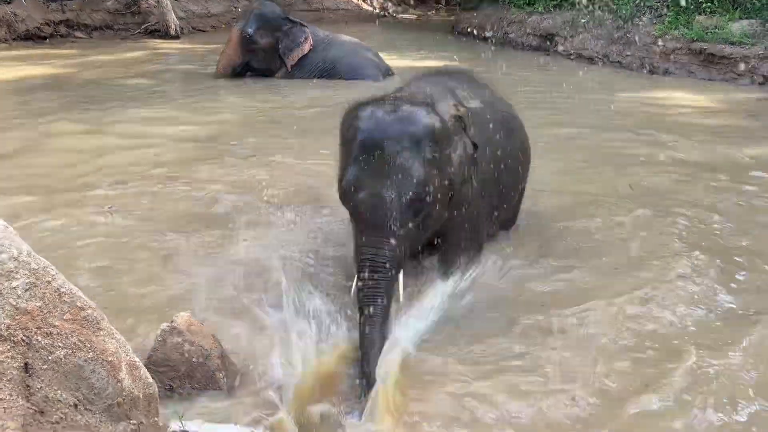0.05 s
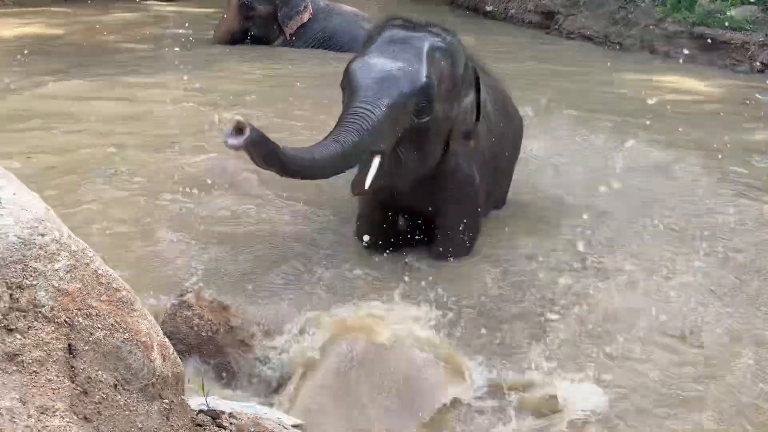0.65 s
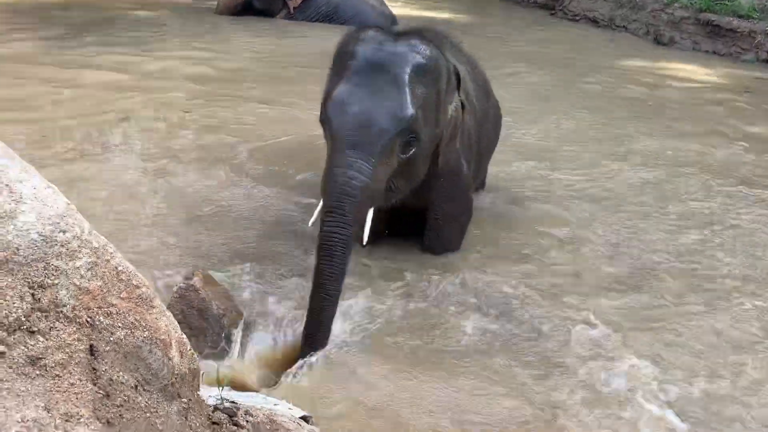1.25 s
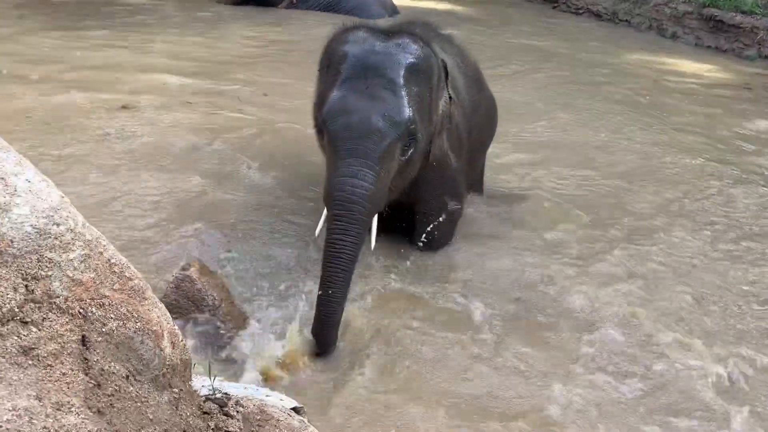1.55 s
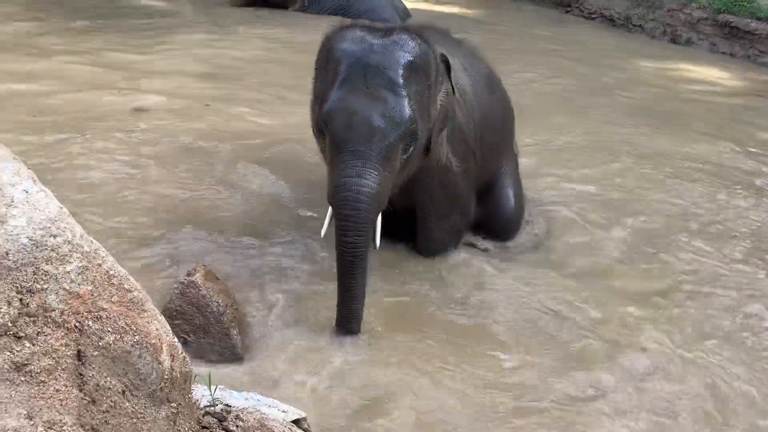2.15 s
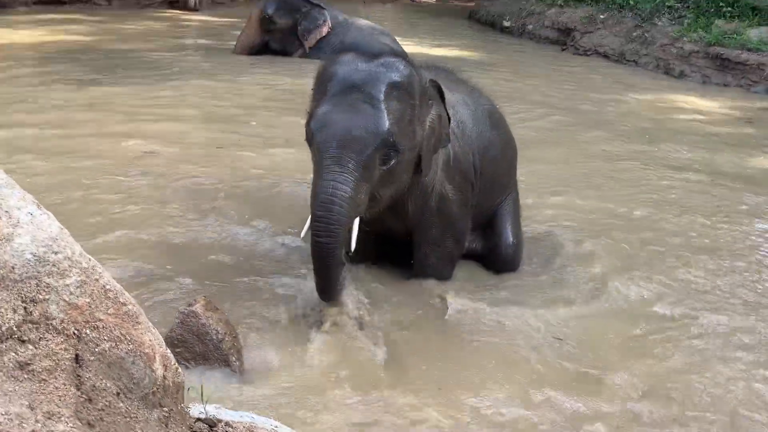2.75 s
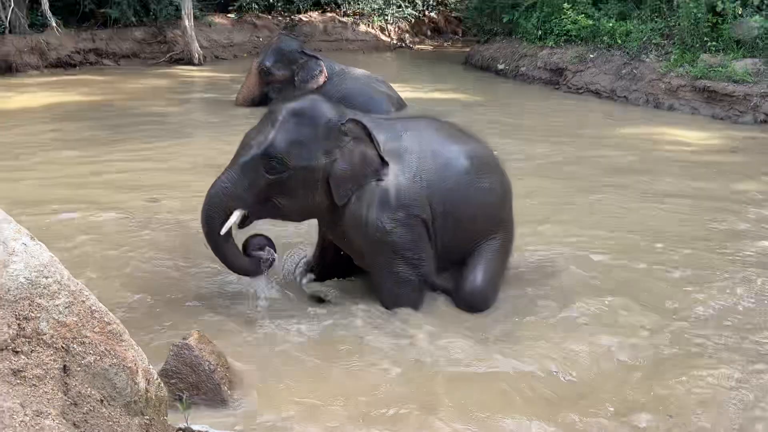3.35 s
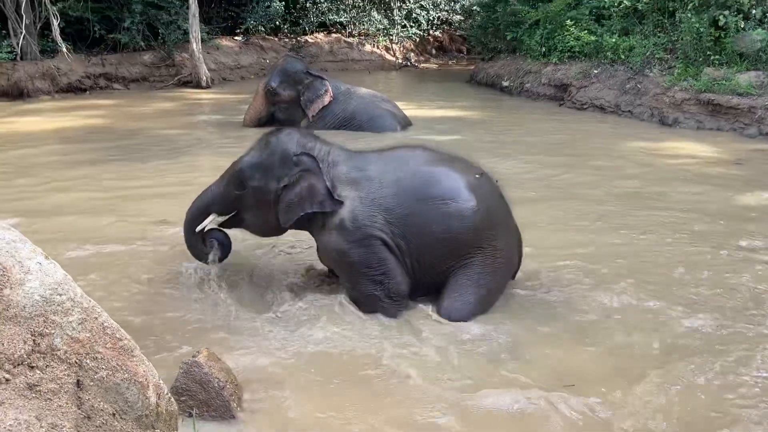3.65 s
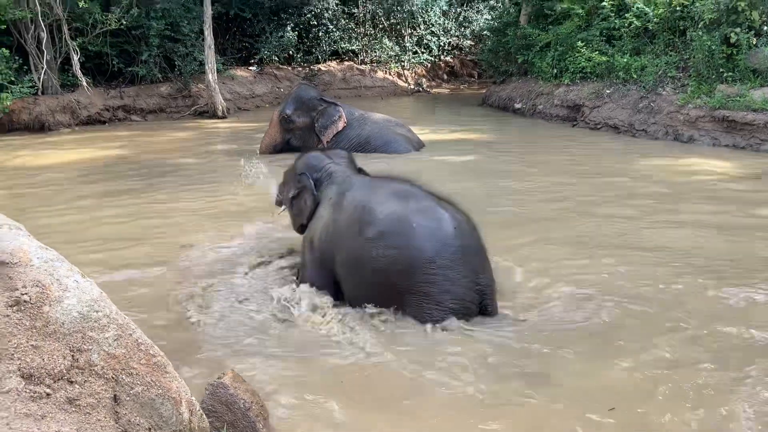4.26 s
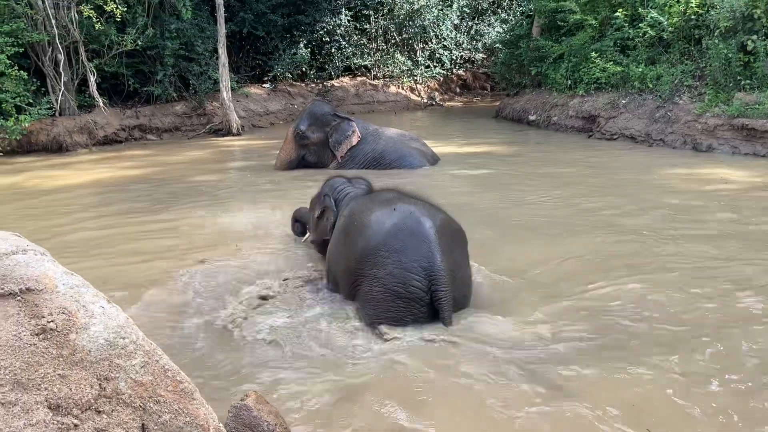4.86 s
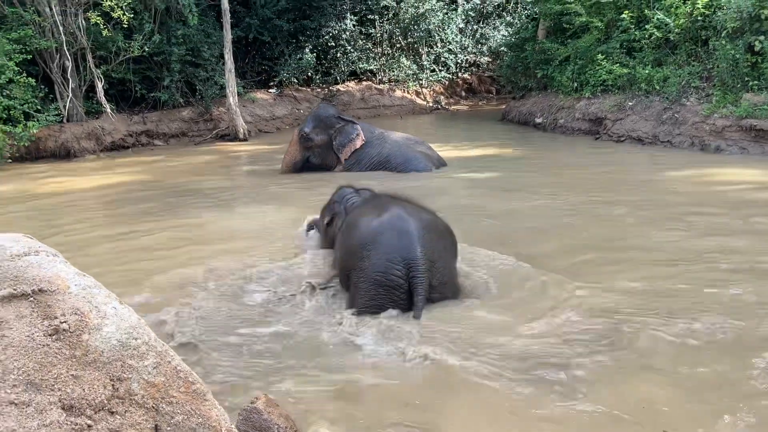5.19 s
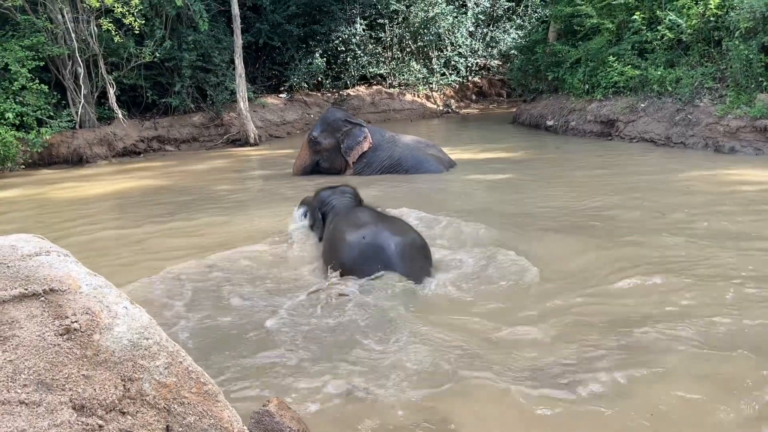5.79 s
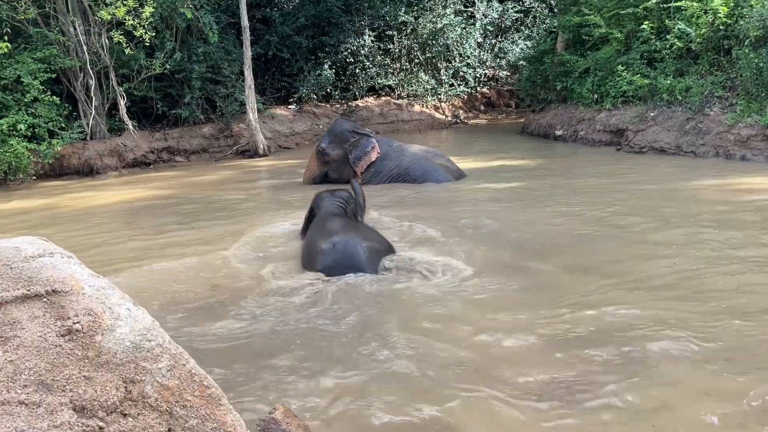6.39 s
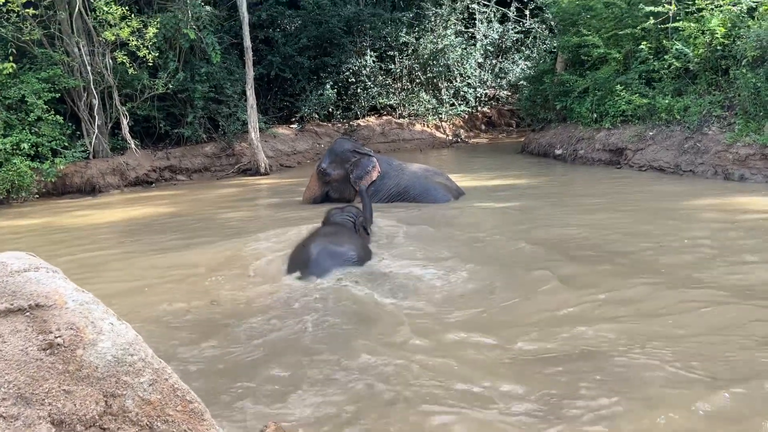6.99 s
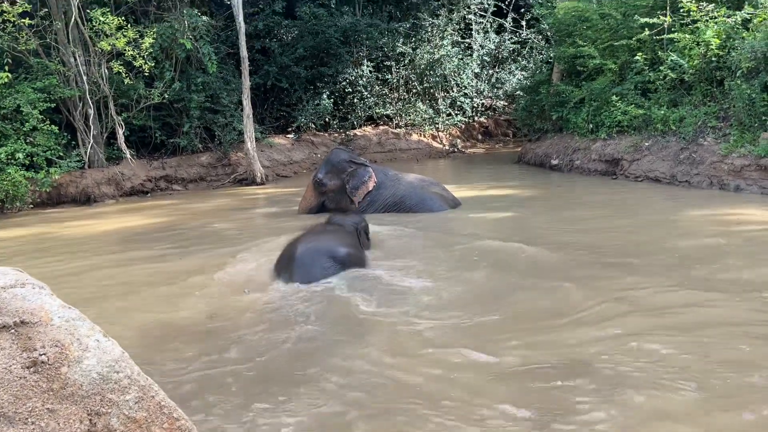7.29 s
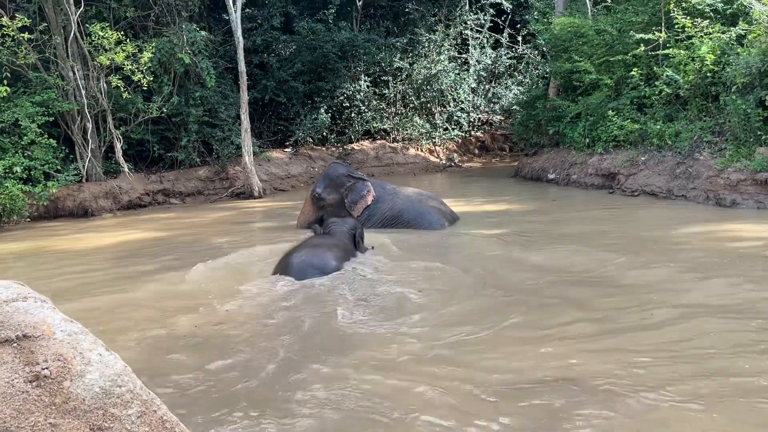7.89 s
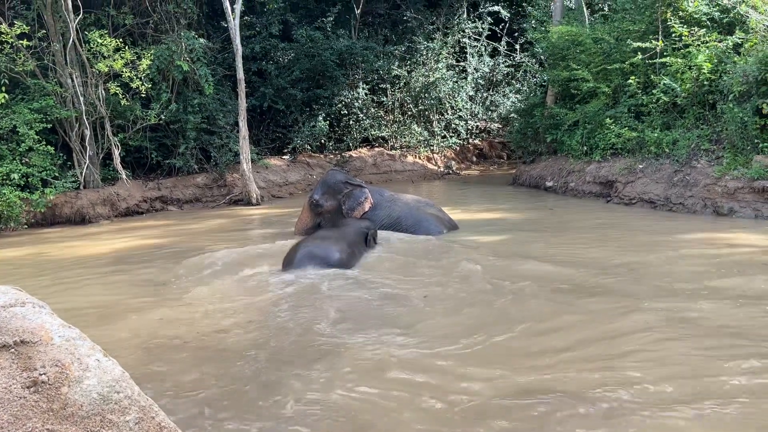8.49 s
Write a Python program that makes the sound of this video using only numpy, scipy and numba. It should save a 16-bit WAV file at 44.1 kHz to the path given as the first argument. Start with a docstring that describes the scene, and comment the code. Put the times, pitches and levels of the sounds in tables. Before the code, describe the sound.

A young elephant slaps its trunk on a pond with a loud, deep smack, and the thrown water rains back in a fizzing patter. Smaller splashes, drips and bubbles follow. The animal then wades off, shoving the water in a run of sloshes, plops and hollow gulps that settle into gentle lapping. It is heard from the bank on a phone, with faint forest hiss and a low distant drone underneath.

```python
"""A young elephant slaps its trunk on a muddy pond, the thrown water rains back, and it wades off and sinks in.
The water's voice is trapped air ringing: big pockets plop and gulp, clouds of small bubbles churn
and fizz, and gritty bursts of noise give the smacks, splats and ticks their attack.
Underneath lies a bed of low distant drone and forest hiss; a phone listens from the bank."""
import sys
import numpy as np
from scipy import signal
from scipy.fft import rfft, irfft, next_fast_len
from scipy.io import wavfile
from scipy.ndimage import uniform_filter1d
from numba import njit

SR = 44100
rng = np.random.default_rng(int(sys.argv[2]) if len(sys.argv) > 2 else 0)


def wrap_up_sound(samples):
    """Save the sound to the file named by the first command line argument, as 16-bit audio."""
    columns = np.atleast_2d(samples).T
    # keep every value between -1 and 1, then stretch to whole-number steps
    tamed = np.clip(columns, -1, 1)
    steps = np.round(tamed * 32767).astype(np.int16)
    wavfile.write(sys.argv[1], SR, steps)


N = 385434
T = np.arange(N) / SR

# Tone of the distant drone. Each row: frequency in Hz, relative level in dB.
DRONE_TONE = [(20, -53), (40, -13), (58, 4.5), (70, 0), (100, 3), (150, -9.5), (300, -65), (1000, -52)]
# Tone of the forest hiss. Each row: frequency in Hz, relative level in dB.
FOREST_TONE = [(100, -17), (700, -31), (2000, -10.5), (5000, -11), (15000, -32)]
# Tone of the wash of fine drops. Each row: frequency in Hz, relative level in dB.
WASH_TONE = [(120, -21), (330, 4.5), (750, 8), (2800, 1.5), (5000, -8), (7500, -26), (11000, -11.5),
             (15000, -23)]
# Fader ride of the wash. Each row: time in seconds, level in dB.
WASH_RIDE = [(0.26, -74), (0.29, -37), (0.56, -39.5), (0.76, -32), (0.92, -42.5), (1.15, -48), (1.5, -80)]
# Loudness of churning bubbles by pitch. Each row: pitch in Hz, relative level in dB.
BUBBLE_TONE = [(100, -4.5), (300, -3.5), (750, -2), (1100, -4), (2000, -7), (3200, -7), (5000, -11.5),
               (7500, -20), (11000, -15), (15500, -18)]
# The restless pond between shoves. Each row: time in seconds, lapping in dB, trickling spray in dB.
WAKE = [(0, -36, -36.5), (1.12, -36, -40.5), (1.35, -42, -40.5), (1.9, -41, -44.5), (2.3, -44.5, -46.5),
        (2.7, -36.5, -47), (3.0, -39.5, -39.5), (3.2, -40, -44), (4.4, -35.5, -41.5), (4.85, -41.5, -45.5),
        (5.85, -38, -48.5), (6.4, -39.5, -47), (7.3, -47, -51), (7.75, -44, -52.5), (8.74, -43, -51.5)]
# The wake sloshes most while the body wades deep, less in the shallows and once it floats.
# Each row: time in seconds, slosh in dB relative to the lapping.
WADING_DEPTH = [(3.2, -12), (3.65, -7.5), (5.9, -4), (7.0, -5)]
# Trunk and legs shoving water. Each row: crest in seconds, splash level in dB, length in seconds,
# slosh in dB relative to the splash.
SHOVES = [(0.747, -31, 0.46, -6.5), (1.745, -28.5, 0.024, -12), (2.496, -34.5, 0.063, -14),
          (2.725, -32, 0.012, -2), (2.847, -33.5, 0.074, -22), (3.37, -28, 0.035, -5.5),
          (3.474, -35.5, 0.14, -1.5), (3.703, -32.5, 0.047, 1), (3.99, -31, 0.2, -0.5),
          (4.15, -31.5, 0.072, 4), (4.384, -42.5, 0.3, 1.5), (4.757, -37, 0.064, -8),
          (5.03, -36.5, 0.16, -11), (5.318, -46, 0.47, 1), (5.472, -34, 0.072, -7),
          (5.566, -38.5, 0.042, -1), (5.72, -34, 0.082, -5), (6.75, -43.5, 0.1, -16)]
# Dripping grows slightly until five seconds, then fades away. Each row: time in seconds, level in dB.
DRIP_RIDE = [(0.9, -55), (2.6, -51), (3.5, -50), (5.0, -49), (8.7, -77)]
# Fat drops landing close by. Each row: start in seconds, level in dB, centre in Hz, decay in seconds.
FAT_DROPS = [(0.094, -21.5, 8000, 0.00095), (0.1621, -9.5, 4060, 0.00097), (0.412, -20.5, 4900, 0.0018),
             (0.954, -24.5, 6100, 0.0019), (2.143, -33.5, 6000, .025), (3.0122, -24.5, 6070, 0.00088),
             (3.047, -24, 5730, 0.00068), (3.6608, -25.5, 11500, 0.00049), (3.984, -21.5, 5400, 0.0014),
             (8.5182, -30, 6500, 0.00097)]
# Wavelets hitting the animal. Each row: start in seconds, level in dB, decay in seconds, centre in Hz.
SPLATS = [(1.766, -28, 0.0078, 1300), (2.146, -30.5, 0.018, 1490), (3.098, -23, 0.0032, 1650),
          (3.229, -22.5, 0.0068, 1400), (3.277, -28, 0.0046, 1980), (3.433, -22.5, 0.008, 1550),
          (3.777, -28, 0.0066, 1000), (4.634, -33, 0.0069, 1340), (5.042, -22.5, 0.0013, 1520),
          (5.53, -28, 0.0069, 1500), (5.727, -28.5, 0.0092, 850), (5.885, -35, 0.0042, 1600),
          (6.153, -24.5, 0.0032, 2000)]
# Surfacing bubbles. Each row: crest in seconds, pitch at the crest in Hz, peak in dB.
BLOOPS = [(1.522, 590, -37), (1.699, 915, -32.5), (1.725, 1410, -37), (1.868, 650, -41.5)]
# Cavities that open and close. Each row: widest moment in seconds, pitch there in Hz, level in dB,
# opening time in seconds, closing time in seconds.
GULPS = [(0.323, 206, -32.5, 0.039, 0.015), (0.395, 209.6, -25.5, .014, 0.027),
         (0.438, 278, -32, 0.0085, 0.057), (0.828, 229, -27, 0.013, 0.015),
         (1.424, 386, -30.5, 0.026, 0.017), (3.411, 155.6, -23, .022, 0.039),
         (3.49, 92.4, -33, 0.026, 0.025), (3.964, 229, -29, 0.009, 0.038),
         (5.554, 247.3, -36, 0.024, 0.035), (6.687, 161.5, -26.5, 0.00614, 0.011)]
# Single large bubbles. Each row: start in seconds, pitch in Hz, level in dB before trim.
PLOPS = [(0.162, 1300, -8.5), (0.265, 1420, -14.5), (0.745, 1440, -15), (2.055, 394, -23.5),
         (2.313, 1420, -29), (2.326, 590, -28.5), (2.533, 680, -29), (2.598, 970, -20), (2.64, 660, -17.5),
         (3.012, 705, -19.5), (3.252, 305, -14), (3.335, 594, -14.5), (3.436, 843, -18), (3.463, 1470, -13),
         (3.703, 745, -15.5), (3.883, 348, -17.5), (4.098, 780, -11.5), (4.101, 112.6, -21),
         (4.442, 585, -13.5), (5.312, 420, -26), (7.836, 570, -27), (7.93, 890, -29)]
# Trunk or leg hitting the pond. Each row: start in seconds, smack in dB, smack decay in seconds,
# air pocket pitch in Hz, its level in dB, deep cavity pitch in Hz, its level in dB, its decay in cycles.
BLOWS = [(0.038, -13, 0.018, 537, -11, 253, 0.5, 0.83), (1.2, -30, 0.032, 284, -9.5, 142, -18.5, 0.83),
         (1.439, -24, 0.0059, 423, -9, 93, -8.5, 1.5), (2.448, -33, 0.009, 442, -9, 117, -16, 1.1),
         (5.458, -42, 0.028, 219, -19, 140, -27, 1.2), (6.663, -37, 0.0055, 228, -35, 133, -23, 1.8)]
# Stereo width by frequency. Each row: frequency in Hz, likeness of left and right from 0 to 1,
# left phase lead in radians, left minus right in dB.
STEREO_IMAGE = [(100, .985, 0, .9), (400, .92, 0, 1.), (1400, .72, 0, -1.2), (2100, .85, .2, -.5),
                (3600, .5, 2.3, 1.8), (4900, .35, 0, 3.5), (6800, .55, -1.4, 2), (8300, .96, -3.14, 0),
                (11700, .95, -6.3, 0), (14700, .95, -8.6, 0)]


def undb(db):
    """Decibels to gain."""
    return 10 ** (np.asarray(db) / 20)


def unit(x):
    """Scale to an rms of one."""
    return x / np.sqrt(np.mean(x ** 2))


def ride(points):
    """Draw a fader curve through (seconds, dB) points, in dB."""
    return np.interp(T, *np.transpose(points))


def gain_at(hz, tone):
    """Gain of a (Hz, dB) curve at the given frequencies."""
    f, db = np.transpose(tone)
    return undb(np.interp(np.log(hz + 1), np.log(f), db))


def colour(x, gain):
    """EQ by a gain that is a function of frequency."""
    size = next_fast_len(len(x) + SR // 10)
    return irfft(rfft(x, size) * gain(np.arange(size // 2 + 1) * SR / size), size)[:len(x)]


def toned_noise(tone):
    """Noise shaped to a (Hz, dB) curve, at an rms of one."""
    return unit(colour(rng.standard_normal(N), lambda f: gain_at(f, tone)))


def band(x, lo_hz, hi_hz, order):
    """Band-pass filter."""
    edges = [lo_hz, min(hi_hz, SR / 2 - 1000)]
    return signal.sosfilt(signal.butter(order, edges, "band", fs=SR, output="sos"), x)


def wander(rate_hz):
    """Smooth random modulation with a spread of one."""
    return unit(colour(rng.standard_normal(N), lambda f: np.exp(-(f / rate_hz) ** 2)))


@njit
def ring(start, hz, size, decay, glide):
    """Bubbles swell fast and ring out, bending in pitch by the fraction `glide` per decay time."""
    out = np.zeros(N)
    for k in range(len(start)):
        first, phase = max(int(start[k] * SR), 0), 0.
        fade, step = 1., np.exp(-1 / (decay[k] * SR))
        for i in range(min(int(6 * decay[k] * SR), N - first)):
            phase += 2 * np.pi * hz[k] / SR * (1 + glide[k] * min(i / (decay[k] * SR), 5.))
            fade *= step
            out[first + i] += size[k] * fade * (1 - fade ** 4) * np.sin(phase)
    return out


def bursts(rows, width, mist_db, hold=1, snap=6):
    """Sheets of water burst into gritty noise; hold squares off the tail, snap sharpens the attack."""
    out = np.zeros(N + SR)
    t = np.arange(SR // 4) / SR
    for start, db, decay, hz in rows:
        grit = undb(3 * unit(uniform_filter1d(rng.standard_normal(len(t)), size=30)))
        noise = grit * rng.standard_normal(len(t))
        body = unit(band(noise, hz / width, hz * width, order=2))
        mist = unit(band(noise, hz, 6 * hz, order=1))
        rush = body + undb(mist_db) * mist
        swell = np.exp(-(t / decay) ** hold) * (1 - np.exp(-snap * t / decay))
        rms = np.sqrt(np.mean(swell ** 2) * np.mean(rush ** 2))
        first = int(start * SR)
        out[first:first + len(t)] += undb(db) * rms * unit(swell * rush)
    return out[:N]


def reflections(x, decay_s, delay_s):
    """A dense echo tail after a pre-delay, as strong as the sound itself."""
    t = np.arange(SR // 2) / SR
    tail = rng.standard_normal(len(t)) * np.exp(-t / decay_s) * (t >= delay_s)
    return signal.fftconvolve(x, tail / np.sqrt(np.sum(tail ** 2)))[:N]


def stereo_image(ahead, aside):
    """Stereo width by frequency; left and right drift apart in phase in the treble."""
    hz, likeness, lead, balance_db = np.transpose(STEREO_IMAGE)
    channels = []
    for sign in (1, -1):
        mid = colour(ahead, lambda f: np.sqrt((1 + np.interp(f, hz, likeness)) / 2))
        side = colour(aside, lambda f: np.sqrt((1 - np.interp(f, hz, likeness)) / 2))
        channels.append(colour(mid + sign * side, lambda f: undb(sign * np.interp(f, hz, balance_db) / 2)
                               * np.exp(sign * 1j * np.interp(f, hz, lead) / 2)))
    return np.array(channels)


def forest(level_db=-54):
    """A steady bed of hiss from the trees."""
    return undb(level_db) * toned_noise(FOREST_TONE)


def drone(rumble_db=-46, hum_hz=58):
    """A low distant rumble with a wavering hum that swells towards the end."""
    rumble = undb(rumble_db) * toned_noise(DRONE_TONE)
    drift_hz, waver_db = 1.6 * wander(2.9), 2.2 * wander(5)
    hum = np.sin(2 * np.pi * np.cumsum(hum_hz + drift_hz) / SR)
    return rumble + hum * undb(ride([(6, -52), (8, -43)]) + waver_db)


def wash(flutter_db=2.5):
    """The finest falling drops blur into a fluttering wash on two patches of the pond."""
    patches = [toned_noise(WASH_TONE) * undb(flutter_db * wander(40)) for _ in range(2)]
    return np.array(patches) * undb(ride(WASH_RIDE))


def bubble_cloud(lo_hz, hi_hz, count, cycles, spread_db, glide, froth_db):
    """Two patches of bubbles in one size range, a few poking out, over a froth of noise."""
    patches = []
    for _ in range(2):
        when, pitch, luck, damping, rise = rng.random((count, 5)).T
        hz = lo_hz * (hi_hz / lo_hz) ** pitch
        size = hz * gain_at(hz, BUBBLE_TONE) * undb(-spread_db * np.log(luck + 0.025))
        decay = cycles * 2 ** (2 * damping - 1) / hz  # small bubbles die sooner
        bubbles = ring(when * N / SR, hz, size, decay, 2 * glide * rise)
        bubbles = band(bubbles, lo_hz / 1.21, hi_hz * 0.81, order=2)
        froth = band(toned_noise(BUBBLE_TONE), lo_hz, hi_hz, order=4)
        patches.append(unit(bubbles) + undb(froth_db) * unit(froth))
    return unit(np.array(patches))


def falling_water(start_s=0.17, attack_s=0.092, hold_s=0.64, release_s=0.12):
    """Envelope of the water that the first slap throws up, raining back."""
    age = T - start_s
    return np.clip(age / attack_s, 0, 1) * np.exp(-np.maximum(age - attack_s - hold_s, 0) / release_s)


def stirring(rain_db=(-61, -49, -35), shove_spray_db=-9, rise=0.94, fall=1.08):
    """Gains of slosh, splash and spray before trim: wake, falling water and shoves add their power."""
    times, *levels = np.transpose(WAKE)
    lapping_db, trickle_db = (np.interp(T, times, db) for db in levels)
    power = undb([lapping_db + ride(WADING_DEPTH), lapping_db, trickle_db]) ** 2
    power += np.outer(undb(rain_db), falling_water()) ** 2
    for crest, db, length, slosh_db in SHOVES:
        age = (T - crest) / length
        near = np.abs(age) < 10
        swell = np.exp(-np.where(age[near] < 0, (age[near] / rise) ** 2, age[near] / fall))
        power[:, near] += np.outer(undb([db + slosh_db, db, db + shove_spray_db]), swell) ** 2
    return np.sqrt(power)


def churn(splash_trim_db=-4, spray_trim_db=-1.67, surge_db=1.5, ripple_db=1):
    """Large bubbles slosh, middling ones splash, droplets fizz; each breaking ripple lifts them all."""
    slosh_gain, splash_gain, spray_gain = stirring()
    slosh = bubble_cloud(85.2, 635.3, count=3800, cycles=3.73, spread_db=3.5, glide=0.119, froth_db=-5)
    splash = bubble_cloud(584, 3000, count=13000, cycles=3, spread_db=3, glide=0.0073, froth_db=-4)
    spray = bubble_cloud(2485, 13600, count=32000, cycles=5, spread_db=4.5, glide=0.137, froth_db=-1)
    splash = unit(splash * undb(surge_db * wander(12.5))) * undb(splash_trim_db)
    spray = unit(spray * undb(surge_db * wander(11))) * undb(spray_trim_db)
    stirred = slosh * slosh_gain + splash * splash_gain + spray * spray_gain
    return stirred * undb(ripple_db * wander(22))


def drips(count=450, lo_hz=520, hi_hz=3400, cycles=5.6, range_db=22, glide=0.124):
    """Drips off the wet skin: sparse small bubbles that plink clear of the churn."""
    when, pitch, luck, rise = rng.random((count, 4)).T
    hz = lo_hz * (hi_hz / lo_hz) ** pitch
    plinks = ring(when * N / SR, hz, undb(-range_db * luck), cycles / hz, glide * rise)
    return unit(plinks) * undb(ride(DRIP_RIDE))


def fat_drops():
    """Close drops land with a hard, bright tick."""
    ticks = [(start, db, decay, hz) for start, db, hz, decay in FAT_DROPS]
    return bursts(ticks, width=1.47, mist_db=-1.5, snap=8)


def splats():
    """Small waves break against the animal in tight midrange bursts."""
    return bursts(SPLATS, width=1.37, mist_db=-23)


def bloops(rise_oct_per_s=25.98, cycles=9):
    """Surfacing bubbles swell and fade as they chirp upwards."""
    out = np.zeros(N)
    for crest, hz, db in BLOOPS:
        length = cycles / hz
        near = slice(*np.searchsorted(T, [crest - 2 * length, crest + 2 * length]))
        age = T[near] - crest
        phase = 2 * np.pi * np.cumsum(hz * 2 ** (rise_oct_per_s * age)) / SR
        out[near] += undb(db) * np.cos(np.pi * age / length / 4) ** 4 * np.sin(phase)
    return out


def gulps(wobble=0.1274, fall_oct=0.6, rise_oct=0.408):
    """Large cavities with wobbling walls: the pitch sinks as each opens and climbs as it closes."""
    out = np.zeros(N)
    walls = np.exp(wobble * wander(115))
    for widest, hz, db, opening, closing in GULPS:
        near = (T > widest - 2.5 * opening) & (T < widest + 2.5 * closing)
        before = np.maximum(widest - T[near], 0) / opening
        after = np.maximum(T[near] - widest, 0) / closing
        pitch = hz * 2 ** (fall_oct * before + rise_oct * after) * walls[near]
        swell = np.exp(-(before + after) ** 2)
        out[near] += undb(db) * swell * np.sin(2 * np.pi * np.cumsum(pitch) / SR)
    return out


def plops(cycles=5.85, glide=0.048, trim_db=-4.5, rough_db=4, crack_db=-12.5, crack_s=0.003):
    """Air pushed under by trunk and legs pinches off with a crack, then rings with a rough edge."""
    pinches = [(start, db + crack_db, crack_s, 0.95 * hz) for start, hz, db in PLOPS]
    cracks = bursts(pinches, width=1.64, mist_db=-16)
    start, hz, db = np.array(PLOPS, float).T.copy()
    rings = ring(start, hz, undb(db + trim_db), cycles / hz, np.full(len(hz), glide))
    return cracks + rings * undb(rough_db * wander(170))


def blows(smack_hz=1630, body_hz=287, body_db=-16.5, pocket_lag_s=0.0026, cavity_lag_s=0.006):
    """Trunk or leg smacks the pond: trapped air collapses at once, then the deep hole behind it closes."""
    pocket_cycles, pocket_glide, cavity_glide = 1.13, -0.089, -0.011
    bubbles, rushes = [], []
    for start, smack_db, decay, pocket_hz, pocket_db, cavity_hz, cavity_db, cycles in BLOWS:
        collapse, closure = start + pocket_lag_s, start + cavity_lag_s
        bubbles.append((collapse, pocket_hz, undb(pocket_db), pocket_cycles / pocket_hz, pocket_glide))
        bubbles.append((closure, cavity_hz, undb(cavity_db), cycles / cavity_hz, cavity_glide))
        rushes.append((start, smack_db, decay, smack_hz))
        rushes.append((closure, cavity_db + body_db, decay, body_hz))
    thumps = ring(*np.array(bubbles, float).T.copy())
    return thumps + bursts(rushes, width=2.35, mist_db=-4, hold=1.48, snap=21)


def scene(bank_db=-22):
    """Hits up front, churning water spread wide, and a faint return from the wooded bank."""
    hits = blows() + plops() + gulps() + gulps() + splats() + fat_drops() + drips() + bloops()
    ahead, aside = churn() + wash() + wash()
    ahead = ahead + hits
    echo_ahead, echo_aside = (undb(bank_db) * reflections(ahead, decay_s=0.041, delay_s=0.028)
                              for _ in range(2))
    # rocks and ripples close by throw each hit in from the sides
    aside = aside + reflections(hits, decay_s=0.0042, delay_s=0.0016)
    return stereo_image(ahead + echo_ahead + forest() + drone(), aside + echo_aside + forest())


def record(dry, low_cut_hz=36, high_cut_hz=15700):
    """The phone drops the deepest bass, rounds the highest peaks and cuts the top."""
    low_cut = signal.butter(3, low_cut_hz, "high", fs=SR, output="sos")
    high_cut = signal.ellip(8, .2, 70, high_cut_hz, fs=SR, output="sos")
    return signal.sosfilt(high_cut, np.tanh(signal.sosfilt(low_cut, dry)))


dry = scene()
out = record(dry)
wrap_up_sound(out)
```